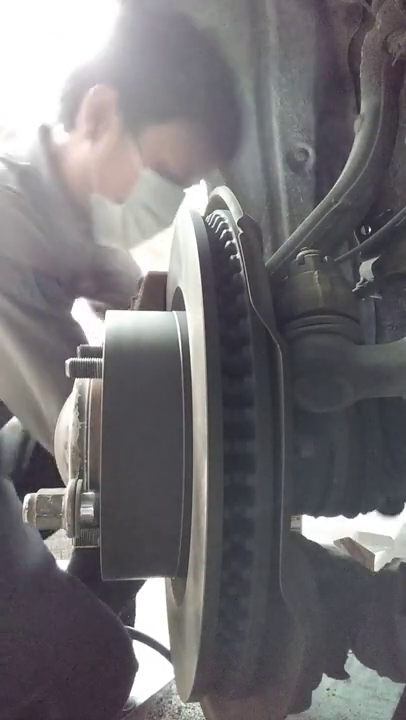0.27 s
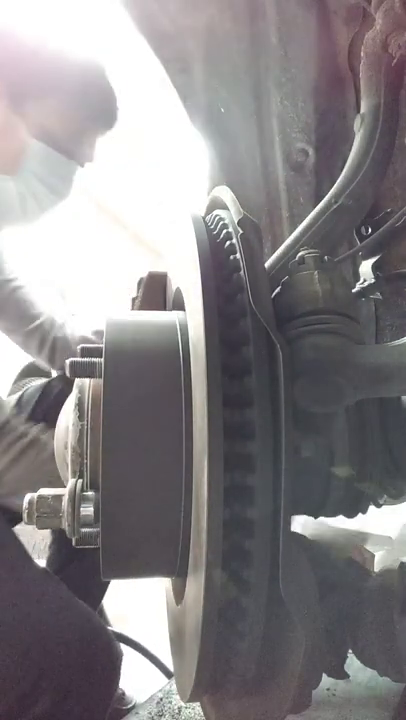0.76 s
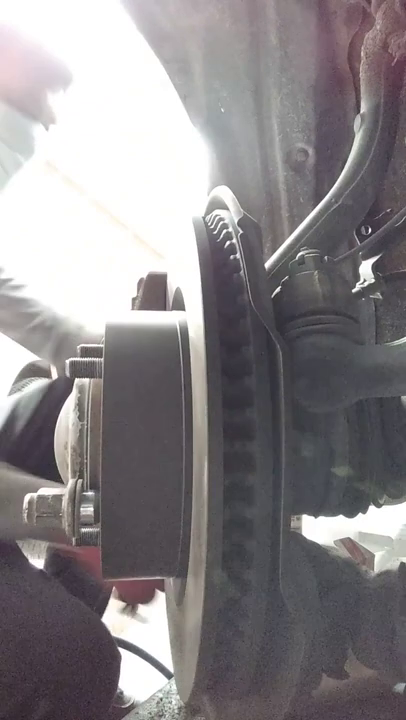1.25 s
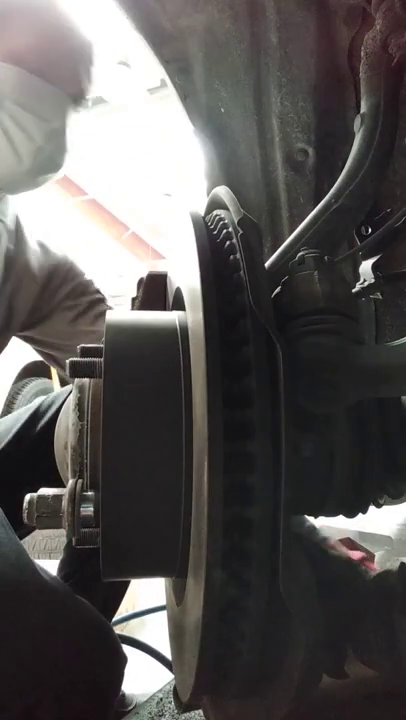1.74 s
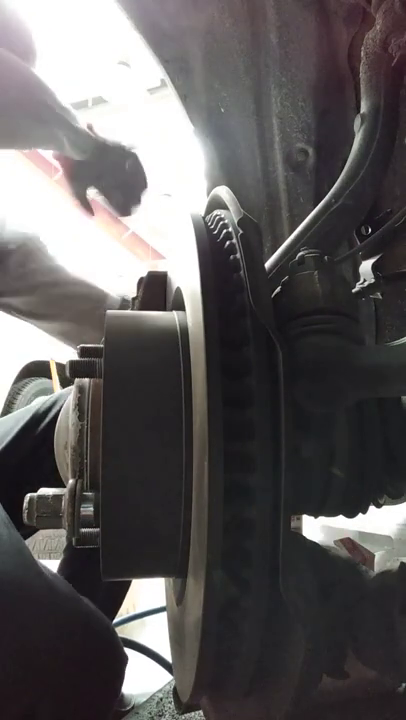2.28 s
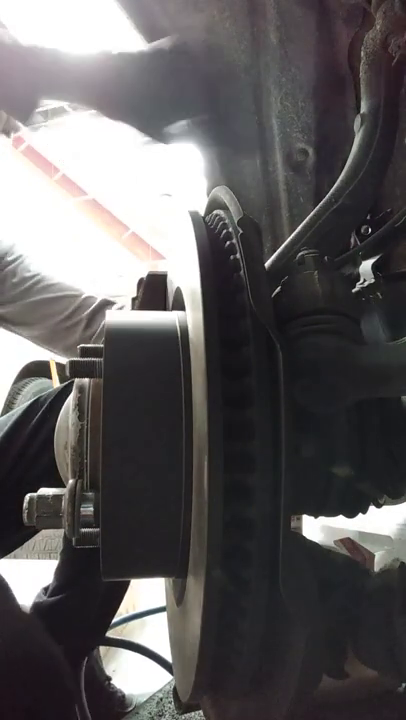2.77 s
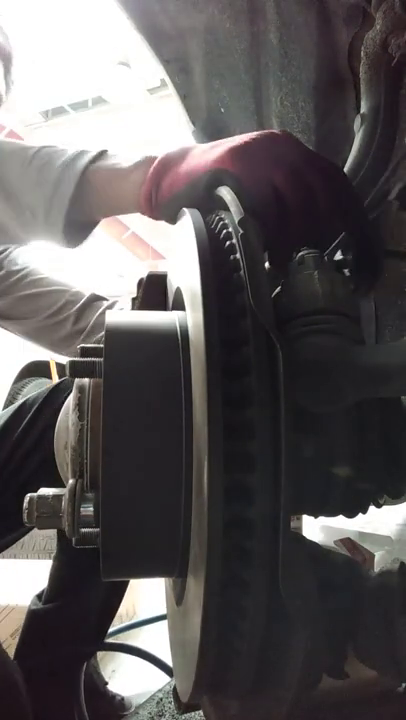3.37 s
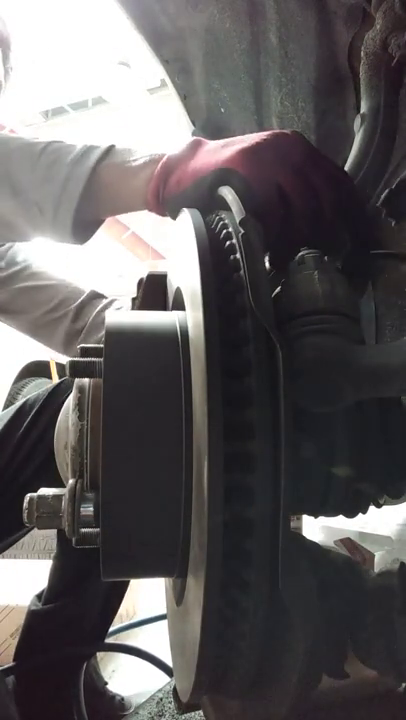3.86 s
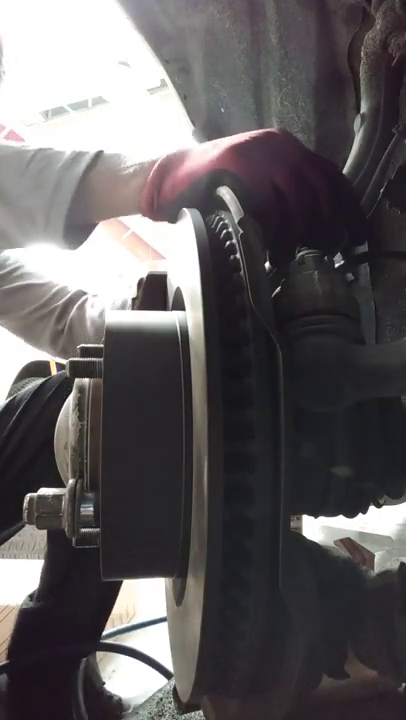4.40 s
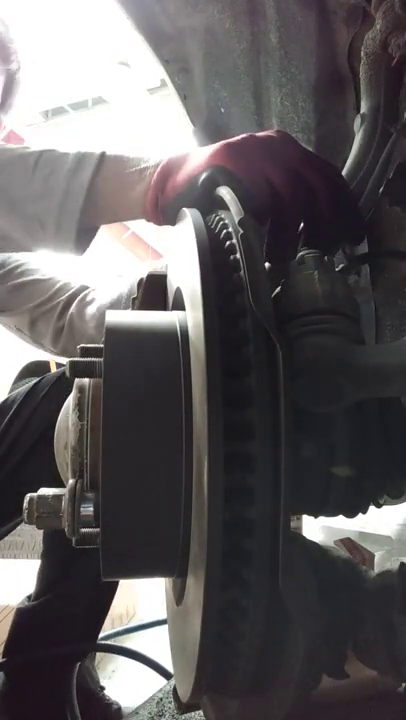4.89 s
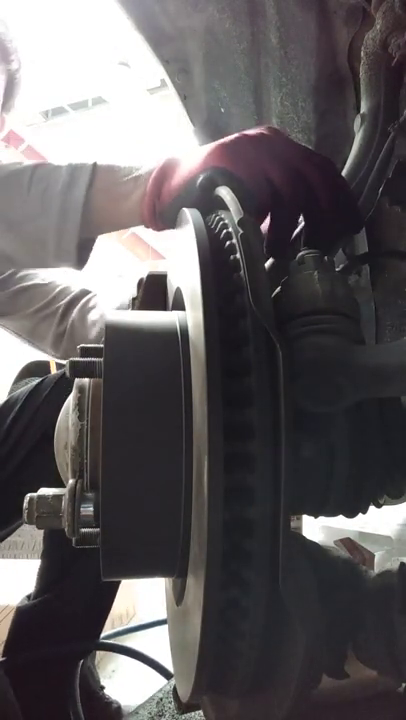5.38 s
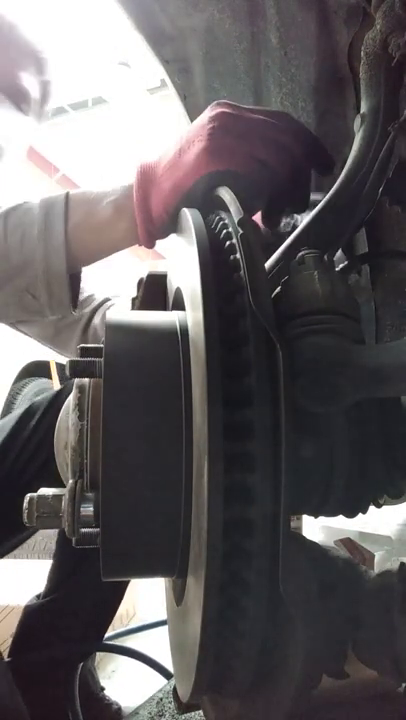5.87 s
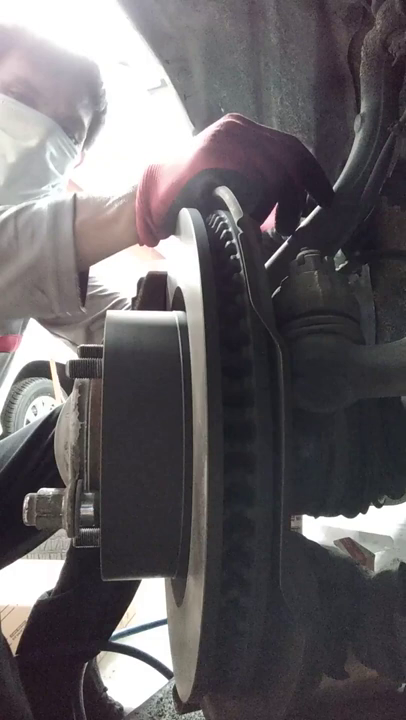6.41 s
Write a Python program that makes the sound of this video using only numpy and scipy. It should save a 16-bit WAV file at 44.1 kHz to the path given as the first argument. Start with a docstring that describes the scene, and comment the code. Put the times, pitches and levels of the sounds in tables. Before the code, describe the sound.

Close stereo pickup beside a wheel hub: a very loud, fast metallic rattle is already ending, trailing bright ringing and a short air exhaust. Air keeps hissing thinly from a hose. The tool is dropped with a hollow, tumbling clank. Then it is much quieter, with soft hollow scrapes and tiny ticks, before small steel parts ping and knock sharply. Distant motors throb low throughout the lightly reverberant workshop.

```python
"""A pneumatic impact wrench rattles on a brake caliper bolt and stops; the disc rings on and spent air rushes out.
A thin jet keeps hissing from the hose coupling. Soon a rub is heard, then the heavy tool is put down with a
booming clatter on hollow steel. A hand works the loose parts with faint ticks and hollow rubs, until a washer,
a bolt and the caliper bracket clink as ringing steel under short bursts of noise. Throughout, two motors beat
against each other over the workshop's steady air, and a limiter ducks under the loud moments."""
import sys
import numpy as np
from scipy import signal
from scipy.fft import rfft, irfft, next_fast_len
from scipy.io import wavfile
from scipy.ndimage import uniform_filter1d, minimum_filter1d, map_coordinates

SR = 44100
rng = np.random.default_rng(int(sys.argv[2]) if len(sys.argv) > 2 else 0)


def transcribe(u):
    """Save the signal u as a 16-bit wav file named by the first command-line argument.

    u: samples, shape (n,) or (channels, n), limited to [-1, 1]; the rate is SR.
    q: integer samples, one column per channel.
    """
    v = np.clip(np.atleast_2d(u).T, -1, 1)
    q = np.round(v * 32767).astype(np.int16)
    wavfile.write(sys.argv[1], SR, q)


N = 293265  # length in samples
TIME = np.arange(N) / SR  # seconds into the scene
AGE = np.arange(SR) / SR  # seconds into a single one-second sound


def amp(db):
    """Decibels to gain."""
    return 10 ** (np.asarray(db) / 20)


def unit(x):
    """Scale to rms 1."""
    return x / np.sqrt(np.mean(x ** 2) + 1e-20)


def along(points, hz):
    """Read (Hz, value) points on a log frequency axis."""
    f, v = np.transpose(points)
    return np.interp(np.log(hz + 1), np.log(f + 1), v)


def curve(rows, t):
    """Read (seconds, value) rows at times t."""
    return np.interp(t, *np.transpose(rows))


def wobble(rate):
    """A smooth random curve through `rate` knots a second."""
    knots = rng.standard_normal(400)
    return map_coordinates(knots, [TIME * rate], mode="wrap")


def fade(t60):
    """Free decay over one second, falling 60 dB in t60 seconds."""
    return np.exp(-np.log(1000) * AGE / t60)


def add(track, s, sound):
    """Mix a sound in at time s, which may lie before the start."""
    at = round(s * SR)
    part = sound[:, max(-at, 0):max(N - at, 0)]
    track[:, max(at, 0):][:, :part.shape[1]] += part


# How alike the two channels of any noise are. Each row: frequency in Hz, left-right correlation from 0 to 1.
STEREO_LIKENESS = [(100, 0.92), (300, 0.92), (550, 0.6), (1000, 0.25), (15000, 0)]


def noise(spectrum, size):
    """Coloured stereo noise of rms 1, mostly shared by the channels in the bass and separate in the treble."""
    m = next_fast_len(size)
    hz = np.fft.rfftfreq(m, 1 / SR)
    # mixing mid and side at this angle gives the wanted correlation
    turn = np.arccos(np.clip(along(STEREO_LIKENESS, hz), -1, 1)) / 2
    white = rfft(rng.standard_normal((2, m)))
    mid, side = irfft(white * amp(along(spectrum, hz)) * [np.cos(turn), np.sin(turn)], m)
    return unit(np.array([mid + side, mid - side])[:, :size])


def clang(spectrum, t60, attack_s=0.003):
    """Countless close modes struck at once and dying together, as a burst of coloured noise."""
    attack = 1 - np.exp(-AGE / attack_s)
    return noise(spectrum, SR) * fade(t60) * attack


def ring(modes, scatter_db):
    """Distinct modes at new strengths; the short waves reach the two microphones out of step."""
    out = np.zeros((2, SR))
    for (hz, db, t60), (size, lag) in zip(modes, rng.standard_normal((len(modes), 2))):
        apart = np.array([[1], [-1]]) * lag * min(hz / 1500, 1)  # phase in radians, narrower in the bass
        out += amp(db + scatter_db * size) * fade(t60) * np.sin(2 * np.pi * hz * AGE + apart)
    return out * (1 - np.exp(-AGE / 0.002))  # soft 2 ms attack


# The workshop's reverberation. Each row: frequency in Hz, decay time t60 in seconds.
WORKSHOP_DECAY = [(150, 1), (330, 1), (600, 0.41), (2500, 0.33), (6000, 0.28), (10000, 0.088),
                  (15000, 0.054)]


def shop(hit, wet_db):
    """A hit with the workshop's answer, each frequency dying at its own speed."""
    hz, t, z = signal.stft(noise([(1, 0), (SR, 0)], SR), SR, nperseg=256)
    decay = np.exp(-np.log(1000) * t / along(WORKSHOP_DECAY, hz)[:, None])
    tail = signal.istft(z * decay, SR, nperseg=256)[1][:, :SR]
    tail = tail * (1 - np.exp(-AGE / 0.0034))
    answer = signal.fftconvolve(hit, tail / np.linalg.norm(tail[0]), axes=1)[:, :SR]
    return hit + amp(wet_db) * answer


# Ringing modes of socket, bolt and disc. Each row: frequency in Hz, relative level in dB.
DISC_MODES = [(866.7, -43), (1007, -31), (1464, -43), (2471, -41), (2805, -40), (3472, -41), (3666, -39),
              (3795, -37), (4081, -41), (4565, -36), (4829, -35), (5588, -34), (5792, -39), (5857, -38),
              (6078, -33), (6385, -29), (6487, -39), (6589, -38), (6815, -41), (6993, -44), (7257, -46),
              (7854, -42), (8032, -47), (8791, -47)]
# Colour of the hammer's crash. Each row: frequency in Hz, relative density in dB per Hz.
CRASH_SPECTRUM = [(120, -23), (200, -7.5), (700, -15), (1500, -14), (3000, -12.5), (4600, -4), (6400, -1.5),
                  (7500, -8.5), (9000, -13), (15500, -18.5)]
# Colour of the spent air. Each row: frequency in Hz, relative density in dB per Hz.
EXHAUST_SPECTRUM = [(59, -49.5), (100, -60), (264, 7), (420, -42), (742, 3.5), (917, -13.5), (1020, -2.5),
                    (1310, -14.5), (1660, -14.5), (6390, -7.5), (15500, -49)]
# the hammer on the anvil: blows a second, nominal time of the last one (s), strength (dB)
BLOW_RATE, LAST_BLOW_S, BLOW_DB = 52, .066, 4.5
DISC_SCATTER_DB = 1.5  # chance differences among the disc's modes
# the disc's ring is choked as the socket comes off the bolt: time (s), extra fall (dB a second)
CHOKE_S, CHOKE_DB_PER_S = 0.32, 128
# air through the motor: level (dB), trigger let go (s), fall after that (dB a second)
AIR_DB, TRIGGER_OFF_S, AIR_FALL_DB_PER_S = -23, 0.23, 167


def wrench(count=8, jitter_s=.001, blow_t60=0.11, disc_db=19, disc_t60=1.02, damping=0.35, build_s=0.024,
           wet_db=-12, disc_wet_db=-17):
    """The hammer strikes the anvil in a fast, slightly uneven train; spent air rushes from the handle."""
    out = np.zeros((2, N))
    # the train is already running when the scene opens
    blow_times = LAST_BLOW_S - np.arange(count) / BLOW_RATE + jitter_s * rng.standard_normal(count)
    for s in blow_times:
        add(out, s, amp(BLOW_DB) * shop(clang(CRASH_SPECTRUM, blow_t60), wet_db))
    # the disc's ring builds up and spreads into the room; its high modes die sooner
    lowest_hz = DISC_MODES[0][0]
    disc = [(hz, db, disc_t60 * (hz / lowest_hz) ** -damping) for hz, db in DISC_MODES]
    ringing = shop(ring(disc, DISC_SCATTER_DB), disc_wet_db)
    choke_db = CHOKE_DB_PER_S * np.maximum(AGE - CHOKE_S, 0)
    build = 1 - np.exp(-AGE / build_s)
    add(out, 0, amp(disc_db - choke_db) * build * ringing)
    air_db = AIR_DB - AIR_FALL_DB_PER_S * np.maximum(TIME - TRIGGER_OFF_S, 0)
    return out + amp(air_db) * noise(EXHAUST_SPECTRUM, N)


# Weight and clank of the tool as it lands, tips over, strikes steel and settles.
# Each row: start in seconds, relative weight in dB, relative clank in dB, loss per bounce in dB.
TOOL_DROPS = [(1.093, -3.5, -13, 0.5), (1.128, 1, -2.5, 11), (1.198, -2, -36, 6), (1.338, -14.5, -10.5, 4),
              (1.43, -18, -16.5, 2), (1.446, -13, -12, 8)]
# Modes of the hollow steel deck. Each row: frequency in Hz, relative level in dB, decay time t60 in seconds.
DECK_MODES = [(162, -15, .35), (189, -14, .4), (219, -10, .45), (283, -3, .28), (297, -1, .4),
              (323, -5, .55), (349, -4, .5), (411, -11, .45), (452, -11, .35), (561, -11, .35),
              (740, -11, .3), (922, -14, .24), (1215, -17, .28)]
# Colour of the tool's dull contact. Each row: frequency in Hz, relative density in dB per Hz.
KNOCK_SPECTRUM = [(70, -49), (140, 2), (330, 3), (550, -0.5), (1000, 2), (2000, -3.5), (5000, -8),
                  (9000, -19), (12500, -19), (15500, -11)]
# Colour of its sharp contact. Each row: frequency in Hz, relative density in dB per Hz.
CLANK_SPECTRUM = [(300, -29), (1500, -13.5), (2700, -3.5), (4000, -7.5), (5500, -4.5), (7000, -12),
                  (9000, -16.5), (13000, -23), (15000, -45)]


def landing(boom_db=-5, knock_db=-1.0, knock_t60=0.12, clank_t60=.15, casing_db=-18, casing_t60=0.18, count=40,
            wet_db=-5):
    """Each contact of the tool booms the deck, knocks its housing and clanks steel on steel."""
    out = np.zeros((2, N))
    pitches = rng.uniform(1800, 6600, count)
    casing = amp(casing_db) * ring([(hz, 0, casing_t60) for hz in pitches], scatter_db=1.0)  # tool's thin ring
    for start, weight, clank, loss_db in TOOL_DROPS:
        for s, db in chatter(start, loss_db):
            knock = amp(weight + knock_db) * clang(KNOCK_SPECTRUM, knock_t60)
            contact = knock + amp(clank) * clang(CLANK_SPECTRUM, clank_t60)
            boom = amp(weight + boom_db) * ring(DECK_MODES, scatter_db=4.0)
            add(out, s, amp(db) * (shop(contact, wet_db) + amp(clank) * casing + boom))
    return out


BOUNCE_GAP_S, BOUNCE_SCATTER_S = .018, .002  # the chatter after each drop


def chatter(s, loss_db, count=5):
    """A drop and its quick, slightly uneven bounces, each weaker than the last: (s, dB)."""
    gaps = BOUNCE_GAP_S + BOUNCE_SCATTER_S * rng.standard_normal(count - 1)
    times = s + np.append(0, np.cumsum(gaps))
    return zip(times, -loss_db * np.arange(count))


# Colour of the high tick in every clink. Each row: frequency in Hz, relative density in dB per Hz.
TICK_SPECTRUM = [(2000, -23), (8000, 19), (12000, 13), (15500, 15)]


def clinks(taps, modes, spectrum, clash_t60, tick_db, tick_t60, bounce_s, bounce_db, right_db, wet_db):
    """A small steel part is tapped and bounces once: clash and ring, sharp taps gaining most in the tick."""
    out = np.zeros((2, N))
    for s, strength_db, sharp_db in taps:
        for delay, db in [(0, strength_db), (bounce_s, strength_db + bounce_db)]:
            clash = amp(sharp_db) * clang(spectrum, clash_t60, attack_s=0.0017)
            tick = amp(tick_db + 2 * sharp_db) * clang(TICK_SPECTRUM, tick_t60)
            add(out, s + delay, amp(db) * (shop(clash + tick, wet_db) + ring(modes, scatter_db=4.5)))
    return out * amp([[-right_db], [right_db]])


# Clash of washer and bracket. Each row: frequency in Hz, relative density in dB per Hz.
BRIGHT_SPECTRUM = [(500, -27), (1250, -22.5), (1700, -20), (2500, -5), (3300, -14), (4600, 0.5),
                   (5300, 9.5), (5900, 7), (6700, -6), (7800, -16), (9500, -44)]
# A washer pinging lightly on the bolt. Each row: start in seconds, relative strength in dB, sharpness in dB.
WASHER_TAPS = [(4.381, -32.5, -6), (4.519, -39, -1)]
# The washer's ring. Each row: frequency in Hz, relative level in dB, decay time t60 in seconds.
WASHER_MODES = [(4630, 5.5, 0.055), (5170, -10.5, 0.097), (5710, 7.5, 0.09), (7300, -7, 0.076)]


def washer_pings():
    """A washer gives light, high pings whose modes die within a tenth of a second."""
    return clinks(WASHER_TAPS, WASHER_MODES, BRIGHT_SPECTRUM, clash_t60=0.17, tick_db=0, tick_t60=0.072,
                  bounce_s=.007, bounce_db=-19, right_db=2, wet_db=-7)


# A loose bolt tapping its hole. Each row: start in seconds, relative strength in dB, sharpness in dB.
BOLT_TAPS = [(4.607, -43.5, -25), (4.879, -23.5, 4), (4.978, -32.5, 13.5), (5.59, -51.5, -6)]
# The bolt's ring. Each row: frequency in Hz, relative level in dB, decay time t60 in seconds.
BOLT_MODES = [(1312, -21, 0.36), (2434, -2, 0.29), (2630, 15, 0.032), (4620, 6, 0.048), (5400, -9, 0.072),
              (5000, -12, 0.28), (5260, -14, 0.11), (5470, -6, 0.11), (5250, -16, 0.11), (5640, -20, 0.25),
              (6670, -4, 0.041), (7820, -23, .15)]
# The bolt's clash. Each row: frequency in Hz, relative density in dB per Hz.
BOLT_SPECTRUM = [(400, -33), (800, -14), (1300, -11.5), (1900, -21), (2600, 4), (3400, -9.5), (4500, 1.5),
                 (5300, 7.5), (5900, 5), (6800, -10.5), (7800, -6.5), (10000, -48)]


def bolt_taps():
    """A loose bolt taps its hole; its strongest mode is short and a few weaker ones ring on."""
    return clinks(BOLT_TAPS, BOLT_MODES, BOLT_SPECTRUM, clash_t60=0.11, tick_db=-31.5, tick_t60=0.29,
                  bounce_s=.016, bounce_db=-10.5, right_db=1.1, wet_db=-9)


# The caliper bracket knocking home. Each row: start in seconds, relative strength in dB, sharpness in dB.
BRACKET_TAPS = [(5.296, -20.5, 7)]
# The bracket's ring. Each row: frequency in Hz, relative level in dB, decay time t60 in seconds.
BRACKET_MODES = [(1205, -21, 0.27), (2284, -6, 0.13), (2750, -14.5, 0.27), (3300, -22, 0.18),
                 (3840, -12, 0.16), (4150, -20, 0.32), (5000, -13, 0.31), (4870, 0, 0.11), (5400, -24, 0.6),
                 (6000, -9, 0.19), (6900, -4.5, 0.31), (7607, -17, 0.32), (8166, -20, 0.2)]


def bracket_knock():
    """The bracket knocks home and rings across many spread modes."""
    return clinks(BRACKET_TAPS, BRACKET_MODES, BRIGHT_SPECTRUM, clash_t60=0.12, tick_db=-20.5, tick_t60=0.22,
                  bounce_s=0.0095, bounce_db=-12, right_db=0.3, wet_db=-6.5)


def swells(rows, body, wet_db):
    """Noise in a hollow body's resonance swells and ebbs as a bell curve around each given time."""
    out = np.zeros((2, N))
    for s, db, width in rows:
        rise_s = 3 * width
        swell = np.exp(-((AGE - rise_s) / width) ** 2 / 2)
        add(out, s - rise_s, amp(db) * shop(swell * noise(body, SR), wet_db))
    return out


# Rubs as the parts are worked. Each row: peak time in seconds, level in dB, bell width (sigma) in seconds.
RUB_STROKES = [(0.876, -39, 0.019), (2.77, -46, 0.018), (3, -41, 0.03), (3.305, -37.5, 0.014),
               (3.347, -29, 0.006), (3.366, -31, .012), (3.86, -33, 0.0081), (4.024, -49.5, 0.011)]
# Hollow colour of the rubs. Each row: frequency in Hz, relative density in dB per Hz.
RUB_SPECTRUM = [(300, -19), (490, -12.5), (620, -16), (750, 10), (880, -13), (1100, -20.5), (1450, -34),
                (1720, -10), (2100, -73), (2700, -16), (5000, -98)]


def rubs():
    """Short strokes of friction sound through a hollow resonance."""
    return swells(RUB_STROKES, RUB_SPECTRUM, wet_db=-11.5)


# Faint swells of the deck. Each row: peak time in seconds, level in dB, bell width (sigma) in seconds.
DECK_SWELLS = [(.83, -55.5, 0.18), (1.69, -46.5, 0.075), (2.13, -55, .15), (5.75, -64.5, .15)]
# The deck's low resonance. Each row: frequency in Hz, relative density in dB per Hz.
DECK_SWELL_SPECTRUM = [(150, -60), (250, -32), (310, 1.5), (355, 3), (430, -11.5), (560, -103), (740, -8),
                       (1000, -67), (3000, -57)]


def deck_swells():
    """The hollow deck's low resonance swells and lingers faintly around 300-350 Hz."""
    return swells(DECK_SWELLS, DECK_SWELL_SPECTRUM, wet_db=-1.5)


# The coupling's hiss as the hose is turned and shielded. Each row: time in seconds, level in dB.
LEAK_LEVELS = [(.4, -35), (.95, -36), (1.08, -43), (1.7, -44), (2.1, -52), (2.45, -43.5), (2.8, -48),
               (3.15, -42), (3.55, -44.5), (3.95, -49), (4.3, -61.5), (4.75, -67), (5.15, -51.5),
               (5.6, -57), (6.05, -51), (6.4, -56), (6.65, -47.5)]
# Colour of the leaking jet. Each row: frequency in Hz, relative density in dB per Hz.
LEAK_SPECTRUM = [(3000, -19), (4600, -6), (5600, 5), (6500, 3), (7500, -3), (9000, -11), (11500, -5.5),
                 (15500, -20)]
JET_PATCHY_DB = 6.5  # depth of uneven patches in the noise


def leak(unsteady_db=0.57):
    """A thin jet of air hisses at the hose coupling, slightly unsteady in strength."""
    z = signal.stft(noise(LEAK_SPECTRUM, N), nperseg=512)[2]
    # random gain for each frequency bin, smoothed over time
    patches = unit(uniform_filter1d(rng.standard_normal(z.shape[1:]), size=14, axis=1))
    jet = unit(signal.istft(z * amp(JET_PATCHY_DB * patches), nperseg=512)[1][:, :N])
    level_db = curve(LEAK_LEVELS, TIME) + unsteady_db * wobble(52)
    return amp(level_db) * jet


def fumbling(count=70, level_db=-56, centre_hz=1800, spread=0.65, t60=0.15, wet_db=-3):
    """Faint random ticks, each one decaying mode, while the hand feels its way among the parts."""
    out = np.zeros((2, N))
    for s, (pitch, shift) in zip(np.linspace(1.8, 6.4, count), rng.standard_normal((count, 2))):
        tick = ring([(centre_hz * np.exp(spread * pitch), level_db, t60)], scatter_db=5)
        add(out, s + 0.068 * shift, shop(tick, wet_db))
    return out


# Loudness of the motors. Each row: time in seconds, level in dB.
MOTOR_LEVELS = [(0, -36.5), (1, -35.5), (1.8, -40), (3, -43.5), (4.2, -44.5), (4.7, -40), (5.6, -51.5),
                (6.2, -41.5), (6.65, -51.5)]
# Colour of the mounting's rumble. Each row: frequency in Hz, relative density in dB per Hz.
RUMBLE_SPECTRUM = [(25, -3.5), (60, -8), (110, 11.5), (165, 1.5), (210, -15), (400, -43)]
# two motors hum at nearly one pitch and beat: mean pitch, difference and the mains hum (Hz)
MOTOR_HZ, BEAT_HZ, MAINS_HZ = 64.95, 5.72, 100
IN_STEP_S = .16  # a moment when the two motors nominally swell together


def machine(upper_db=2.3, drift=0.33, waver_db=1.3, rumble_db=-7, rumble_power=2.1, mains_db=-13):
    """Two distant motors beat against each other; their mounting rumbles at the same nominal beat."""
    apart = np.pi * BEAT_HZ * (TIME - IN_STEP_S)
    turn = 2 * np.pi * (MOTOR_HZ * TIME + rng.random())
    lower = np.sin(turn - apart + drift * wobble(2.9))
    upper = np.sin(turn + apart + drift * wobble(2.4))
    hum = unit(lower + amp(upper_db) * upper)
    rumble = unit(np.abs(np.cos(apart)) ** rumble_power * noise(RUMBLE_SPECTRUM, N))
    mains = unit(np.sin(2 * np.pi * MAINS_HZ * TIME))
    level_db = curve(MOTOR_LEVELS, TIME) + waver_db * wobble(6.7)
    return amp(level_db) * (hum + amp(rumble_db) * rumble + amp(mains_db) * mains)


# Colour of the workshop's air. Each row: frequency in Hz, relative density in dB per Hz.
AIR_SPECTRUM = [(15, -65), (25, -44), (46, -6), (66, -2), (110, -15), (240, -21), (349, -22), (1200, -24),
                (2770, -24), (3090, -25), (9300, -41), (15500, -43.5)]


def workshop_air(floor_db=-49):
    """Steady, bass-heavy background noise that wavers by a fraction of a decibel."""
    return amp(floor_db + 0.1 * wobble(1.9)) * noise(AIR_SPECTRUM, N)


def scene(left_db=0.07):
    """All sources over the workshop's steady air, the deck a hair to the left."""
    deck = (landing() + deck_swells()) * amp([[left_db], [-left_db]])
    parts = washer_pings() + bolt_taps() + bracket_knock() + rubs() + fumbling()
    return wrench() + deck + parts + leak() + machine() + workshop_air()


TOP_HZ = 15900  # upper edge of the band


def record(dry, ceiling_db=2.5, release_db_per_s=110, hardness=5):
    """The limiter ducks on peaks and recovers steadily; the rest is rounded off and the top band cut."""
    over_db = np.maximum(20 * np.log10(np.abs(dry).max(0) + 1e-9) - ceiling_db, 0)
    # hold the greatest excess so far, less a steady release
    release_db = release_db_per_s * TIME
    duck_db = np.maximum.accumulate(over_db + release_db) - release_db
    # about 1 ms of smoothing and look-ahead
    gain = uniform_filter1d(minimum_filter1d(amp(-duck_db), size=45), size=45)
    limited = dry * gain
    rounded = limited / (1 + np.abs(limited) ** hardness) ** (1 / hardness)
    m = next_fast_len(N + SR // 2)
    in_band = np.fft.rfftfreq(m, 1 / SR) < TOP_HZ
    return irfft(rfft(rounded, m) * in_band, m)[:, :N]


dry = scene()
out = record(dry)
transcribe(out)
```